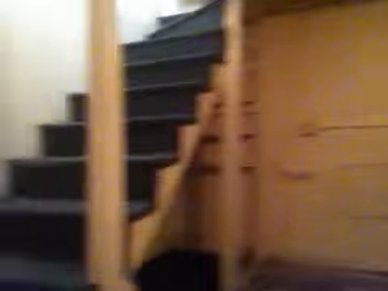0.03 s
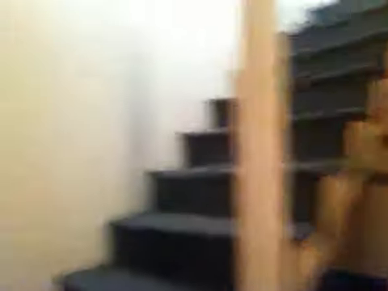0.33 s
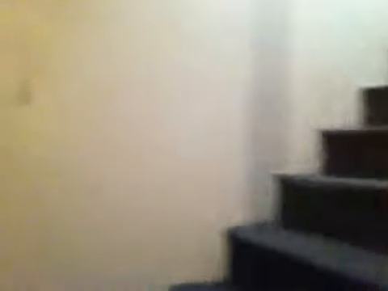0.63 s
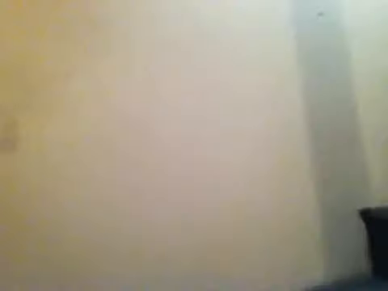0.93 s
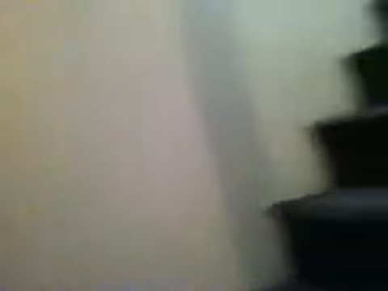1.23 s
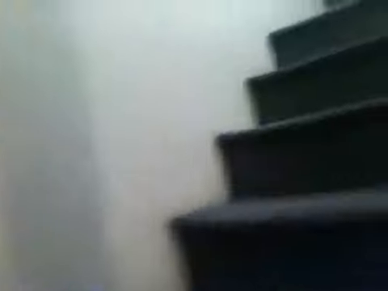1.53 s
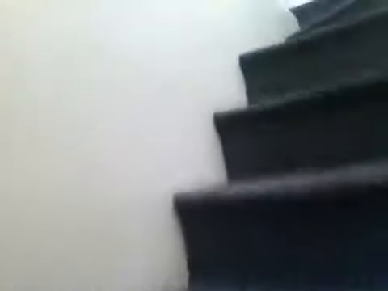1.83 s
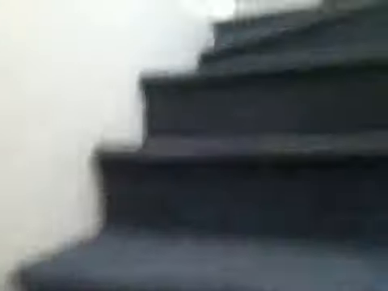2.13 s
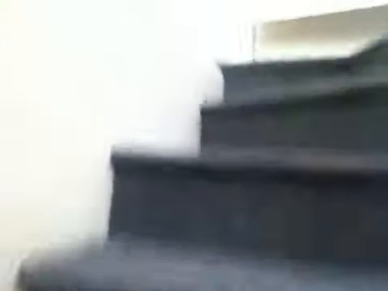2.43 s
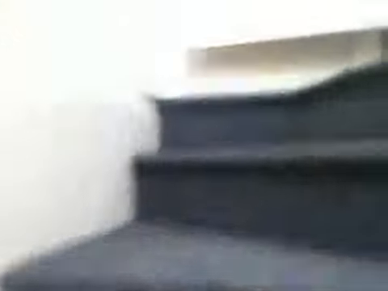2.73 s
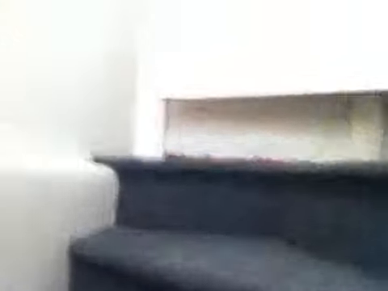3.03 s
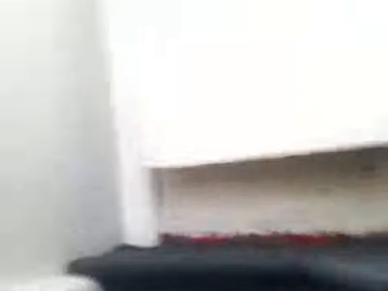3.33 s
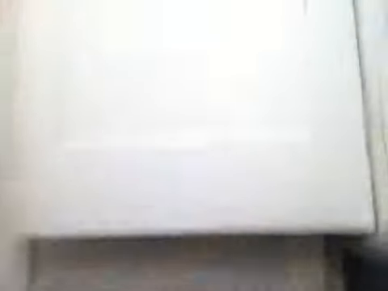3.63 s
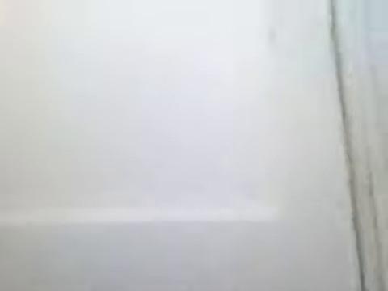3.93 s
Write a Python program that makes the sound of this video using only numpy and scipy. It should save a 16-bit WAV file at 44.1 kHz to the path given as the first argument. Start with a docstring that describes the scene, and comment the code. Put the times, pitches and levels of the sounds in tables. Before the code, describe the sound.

Footsteps thud up a carpeted staircase, a few soft ones first, then a heavier, regular run that booms briefly in the stairwell. The close, carried microphone also catches light scuffs, ticking boards and faint rustling clothes in a quiet house.

```python
"""Climbing carpeted stairs

A wooden staircase in a quiet house, heard close, on a small microphone the climber carries.
Each footfall knocks a tread and sets the hollow flight and the stairwell booming; the sole then
scuffs the pile. Boards tick under the weight, clothes rustle, and a faint hum and hiss lie below."""
import sys
import numpy as np
from scipy import signal
from scipy.fft import rfft, irfft
from scipy.io import wavfile

SR = 44100
rng = np.random.default_rng(int(sys.argv[2]) if len(sys.argv) > 2 else 0)


def generate_wav(sig):
    """Save sig (samples, or channels by samples) to the path in sys.argv[1] as 16-bit PCM at SR."""
    pcm = np.round(np.clip(np.atleast_2d(sig).T, -1, 1) * 32767).astype(np.int16)
    wavfile.write(sys.argv[1], SR, pcm)


N = 176400
TIME = np.arange(N) / SR

# The footfalls. Each row: start in seconds, boom in dB, its bass lift in dB, the Hz above which it
# dulls, knock pitch in Hz, half the knock's amplitude in dB, flight modes in dB, ring pitch in Hz,
# ring in dB, heel pat in dB.
STEPS = [(0.708, -49.5, -7, 485, 308, -46.5, -80, 184, -55, -47.5),
         (1.1053, -33.5, -1.5, 550, 356, -21.5, -40.5, 101, -33, -26.5),
         (1.626, -39, 2, 500, 226, -58, -41.5, 106, -42, -52),
         (2.0924, -21.5, -2, 377, 219, -20.5, -33, 178.2, -22.5, -22.5),
         (2.4042, -21, -4, 650, 406, -17.5, -30.5, 437, -31.5, -20.5),
         (2.7619, -21.5, -1, 657, 604, -14.5, -26, 231.4, -26.5, -35),
         (3.0859, -22, -3.5, 573, 465, -19.5, -29, 488, -27, -39),
         (3.474, -25, -1, 440, 390, -18, -30, 236.2, -24, -44),
         (3.856, -24, -3, 543, 440, -32, -31.5, 228.3, -25.5, -37)]


def from_db(db):
    """Decibels to gain."""
    return 10 ** (np.asarray(db) / 20)


def rms_one(x):
    """Scale to unit rms."""
    return x / np.sqrt(np.mean(x ** 2) + 1e-20)


def at_hz(points, hz):
    """Read a table on a log-frequency axis."""
    f, value = np.transpose(points)
    return np.interp(np.log(np.maximum(hz, 1)), np.log(f), value)


def drift(rate):
    """Random wander of rms 1, with `rate` new values a second."""
    knots = rng.standard_normal(int(N / SR * rate) + 2)
    return rms_one(np.interp(TIME * rate, np.arange(len(knots)), knots))


def noise(spectrum, tilt_db=0):
    """Coloured noise of rms 1, tilted by tilt_db per octave above 500 Hz."""
    hz = np.maximum(np.arange(N // 2 + 1) * SR / N, 1)
    gain = from_db(at_hz(spectrum, hz) + tilt_db * np.log2(np.maximum(hz / 500, 1)))
    return rms_one(irfft(rfft(rng.standard_normal(N)) * gain, N))


def grains(depth_db):
    """Fast uneven gain of many tiny slips."""
    return rms_one(from_db(depth_db * drift(500)))


def strike(start, rise_s, t60):
    """Envelope with a quick rise, then a fall of 60 dB in t60 seconds."""
    age = np.maximum(TIME - start, 0)
    return (1 - np.exp(-age / rise_s)) * from_db(-60 * np.minimum(age / t60, 10))


def swell(middle, half):
    """Bell-shaped envelope of a stroke."""
    return np.exp(-.5 * ((TIME - middle) / half) ** 2)


def after(start_s):
    """Smooth change from 0 to 1 around a time."""
    return .5 + .5 * np.tanh(10 * (TIME - start_s))


def add(out, start, sound):
    """Mix a short sound in at a time."""
    i = int(start * SR)
    out[i:i + len(sound)] += sound[:N - i]


def house():
    """Hissy room tone, and a wavering hum that sinks as the walker leaves the hall."""
    # The hum's tones. Each row: pitch in Hz, level in the hall in dB.
    tones = [(118.4, -73.5), (240, -70.5)]
    # Room tone colour. Each row: frequency in Hz, relative density in dB.
    room_tone = [(25, -34), (70, -40), (115, -12.5), (180, 1), (300, 1.5), (450, 2), (750, -5.5),
                 (1400, -8.5), (2500, -14.5), (6000, -15.5), (11000, -19.5), (15500, -18.5)]
    waver_db, drop_db, room_db = 1.5, -6.5, -60.5
    hum = np.zeros(N)
    for hz, db in tones:
        amplitude = np.sqrt(2) * from_db(db + waver_db * drift(5))
        hum += amplitude * np.sin(2 * np.pi * hz * TIME + drift(5))
    return hum * from_db(drop_db * after(start_s=0.54)) + from_db(room_db) * noise(room_tone)


def clothes():
    """Cloth brushes as the legs swing, and never quite rests once the climb is under way."""
    # The strokes. Each row: middle and half length in seconds, level in dB, tilt in dB per octave.
    strokes = [(0.525, 0.078, -61.5, -1.5), (.87, 0.071, -62.5, 0.5), (1.443, 0.32, -62, -2.5),
               (1.897, 0.13, -59.5, -4), (2.63, 0.18, -57.5, -4.5), (2.9, 0.027, -53.5, -4.5),
               (3.027, 0.074, -58.5, -2), (3.333, 0.032, -58.5, -1.5), (3.647, .025, -53, -5),
               (3.737, 0.12, -56.5, -3.5)]
    # Cloth colour. Each row: frequency in Hz, relative density in dB.
    colour = [(300, -1.5), (1000, 1), (1800, -1), (2600, -1), (4000, -1.5), (6000, -3), (9000, -5),
              (11000, -8), (15500, -10.5)]
    swells = sum(from_db(db) * swell(s, half) * noise(colour, tilt) for s, half, db, tilt in strokes)
    steady = from_db(-64) * after(start_s=1.05) * noise(colour)
    return swells + steady


def shoe_slides():
    """The shoe swishes over the pile; its sole squeaks and rasps faintly in bands of noise."""
    # The swishes. Each row: middle and half length in seconds, level in dB.
    swishes = [(1.88, 0.05, -52.5), (2.041, 0.038, -55), (2.093, 0.018, -50)]
    # Swish colour. Each row: frequency in Hz, relative density in dB.
    colour = [(500, 7), (1800, -7.5), (2300, 3.5), (2900, 3.5), (3300, -3), (4500, -8), (5700, -4),
              (7000, -6.5), (9400, -7.5), (10300, -20), (15500, -22)]
    # The squeaks. Each row: middle and half length in seconds, pitch and filter width in Hz, level in dB.
    squeaks = [(.17, 0.076, 1410, 220, -69), (1.472, 0.028, 1454, 110, -62),
               (1.648, 0.0092, 1774, 90, -50.5), (3.655, .017, 4100, 3400, -55.5),
               (3.91, 0.023, 8860, 1400, -55.5)]
    out = sum(from_db(db) * swell(s, half) for s, half, db in swishes) * noise(colour)
    for s, half, hz, width_hz, db in squeaks:
        b, a = signal.iirpeak(hz, hz / width_hz, fs=SR)
        band = signal.lfilter(b, a, signal.lfilter(b, a, rng.standard_normal(N)))
        out += from_db(db) * swell(s, half) * rms_one(band)
    return out


def shoe_snaps():
    """Brief bright clicks as the shoe flexes."""
    # The snaps. Each row: start in seconds, level in dB.
    snaps = [(1.642, -50), (2.099, -41), (2.434, -37), (2.444, -36.5), (2.797, -47), (3.337, -39.5)]
    # Snap colour. Each row: frequency in Hz, relative density in dB.
    colour = [(500, 2), (1500, 4.5), (2700, -1.5), (3800, 3.5), (5500, -12), (9000, -12.5), (15000, -19)]
    level = sum(from_db(db) * strike(s, rise_s=0.00034, t60=0.033) for s, db in snaps)
    return level * noise(colour) * grains(depth_db=3)


def sole_scuffs():
    """Grainy friction of the sole settling in the pile."""
    # The scuffs. Each row: start in seconds, level in dB, t60 in seconds, tilt in dB per octave.
    scuffs = [(1.13, -52, 0.5, 3), (1.642, -52.5, 0.51, -1), (2.093, -42.5, 0.22, -0.5),
              (2.432, -40.5, 0.23, .5), (2.79, -44.5, 0.19, -1), (3.14, -58, .4, -2), (3.352, -52, .12, 1),
              (3.52, -55, .3, 0), (3.864, -50.5, 0.46, 1.5), (3.915, -47.5, 0.37, -1)]
    # Scuff colour. Each row: frequency in Hz, relative density in dB.
    colour = [(200, -32), (800, 7.5), (1800, 4.5), (2800, 4), (4000, -1.5), (6000, -3.5), (9000, -5.5),
              (11000, -10), (15500, -12)]
    friction = sum(from_db(db) * strike(s, rise_s=0.0088, t60=t60) * noise(colour, tilt)
                   for s, db, t60, tilt in scuffs)
    return friction * grains(depth_db=2.5)


def board_ticks():
    """Short gritty ticks of loaded wood with a little room tail."""
    # The ticks. Each row: start in seconds, level in dB.
    ticks = [(0.234, -60), (0.73, -61), (1.2625, -53), (1.644, -38.5), (1.736, -43), (2.127, -37.5),
             (2.208, -57), (2.441, -35.5), (2.583, -45.5), (2.796, -39.5), (2.824, -46), (3.124, -43.5),
             (3.265, -50.5), (3.336, -43), (3.357, -55), (3.569, -52.5), (3.92, -41.5)]
    # Tick colour. Each row: frequency in Hz, relative density in dB.
    colour = [(60, -3), (200, 9.5), (500, 0.5), (900, 1.5), (1300, -2), (1800, -5), (2500, -11.5),
              (4000, -20), (8000, -31.5), (15000, -47)]
    rise_s, room_db = 0.0012, -6
    direct = sum(from_db(db) * strike(s, rise_s, t60=0.066) for s, db in ticks)
    tail = sum(from_db(db + room_db) * strike(s, rise_s, t60=0.5) for s, db in ticks)
    return (direct + tail) * noise(colour) * grains(depth_db=3)


def heel_pats():
    """The brief pat of the shoe meeting the carpet."""
    # Pat colour. Each row: frequency in Hz, relative density in dB.
    colour = [(150, -5), (400, 5), (650, 6.5), (950, -2.5), (1350, -7), (2000, -22), (4000, -27),
              (8000, -40.5), (15000, -37)]
    level = sum(from_db(db) * strike(s, rise_s=0.0007, t60=0.026) for s, *_, db in STEPS)
    return level * noise(colour)


def stair_booms():
    """Crowded resonances of stairs and stairwell, dying band by band; a soft landing dulls them."""
    # Boom colour. Each row: frequency in Hz, relative density in dB.
    colour = [(30, -66), (60, -40), (80, -5), (110, -9.5), (160, 3), (240, 2), (330, 3.5), (480, 2.5),
              (680, -5.5), (950, -10), (1400, -16), (2500, -24), (6000, -33.5), (15000, -42.5)]
    # How long the stairs ring. Each row: frequency in Hz, t60 in seconds.
    decays = [(60, 0.67), (150, 0.63), (450, 0.51), (1100, 0.28), (4000, 0.19)]
    rise_s, dull_db, bass_edge_hz = 0.0026, -9, 410
    well_db, well_t60, well_low_hz = -7, 0.98, 131
    out, age = np.zeros(N), TIME[:SR]
    edges = 28 * 2 ** np.arange(0, 9.6, .5)  # half-octave bands, Hz
    centres = np.sqrt(edges[1:] * edges[:-1])
    shares = from_db(at_hz(colour, centres)) * np.sqrt(centres)
    shares /= np.linalg.norm(shares)
    for low, high, hz, share in zip(edges, edges[1:], centres, shares):
        white = rng.standard_normal((len(STEPS), SR + 8000))  # extra samples let the filters settle
        band = signal.sosfilt(signal.butter(2, [low, high], "band", fs=SR, output="sos"), white)
        if high < 3000:  # keep the loud low bands out of the treble
            band = signal.sosfilt(signal.butter(2, high * 1.2, fs=SR, output="sos"), band)
        stairs = from_db(-60 * age / at_hz(decays, hz))
        stairwell = from_db(well_db - 60 * age / well_t60) / (1 + (well_low_hz / hz) ** 2)
        rise = 1 - np.exp(-age / (rise_s + .5 / hz))
        envelope = rise * np.hypot(stairs, stairwell)
        for ringing, (s, db, bass_db, dull_hz, *_) in zip(band[:, -SR:], STEPS):
            shelves_db = bass_db / (1 + (hz / bass_edge_hz) ** 4) + dull_db / (1 + (dull_hz / hz) ** 6)
            boom = rms_one(ringing * envelope) * np.sqrt(np.mean(envelope ** 2))
            add(out, s, share * from_db(db + shelves_db) * boom)
    return out


def tread_knocks():
    """Each tread gives a short knock, rings hollowly at its own pitch and shakes the whole flight."""
    # Modes of the hollow flight. Each row: pitch in Hz, relative level in dB, t60 in seconds.
    flight = [(57.3, -20, .6), (68.8, -22, 0.7), (104.6, -5.5, 0.56), (114.95, -3, 0.54), (149, -2, 0.36),
              (234.2, -2, 0.57), (391, 0.5, 0.32), (509, -5, .4)]
    knock_rise_s, knock_t60 = 0.0014, 0.03
    ring_rise_s, ring_t60 = 0.005, 0.37
    scatter_db = 5.5
    out, age = np.zeros(N), TIME[:SR]
    knock_rise = 1 - np.exp(-age / knock_rise_s)
    ring_rise = 1 - np.exp(-age / ring_rise_s)
    for s, _, _, _, knock_hz, knock_db, flight_db, ring_hz, ring_db, _ in STEPS:
        knock = 2 * from_db(knock_db - 60 * age / knock_t60) * np.sin(2 * np.pi * knock_hz * age)
        ring = from_db(ring_db - 60 * age / ring_t60) * np.sin(2 * np.pi * ring_hz * age)
        modes = np.zeros(SR)
        for hz, db, t60 in flight:
            envelope = from_db(flight_db + db + scatter_db * rng.normal() - 60 * age / t60)
            modes += envelope * np.sin(2 * np.pi * hz * age + rng.uniform(0, 2 * np.pi))
        add(out, s, knock_rise * (modes - knock) - ring_rise * ring)
    return out


def scene():
    """Stairs, shoes, clothes and house at the one carried microphone."""
    footfalls = stair_booms() + tread_knocks() + heel_pats() + board_ticks()
    shoes = sole_scuffs() + shoe_snaps() + shoe_slides()
    return (footfalls + shoes + clothes() + house())[None]


def record(dry):
    """The small microphone loses the deepest bass; the recorder cuts the top steeply."""
    low_hz, top_hz = 44.6, 15700
    thin = signal.sosfilt(signal.butter(2, low_hz, "high", fs=SR, output="sos"), dry)
    return signal.sosfilt(signal.ellip(12, .1, 70, top_hz, fs=SR, output="sos"), thin)


dry = scene()
out = record(dry)
generate_wav(out)
```